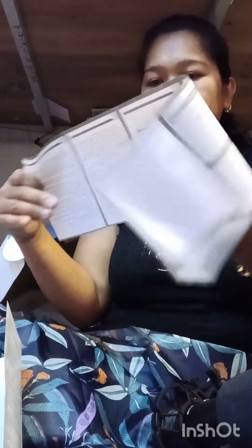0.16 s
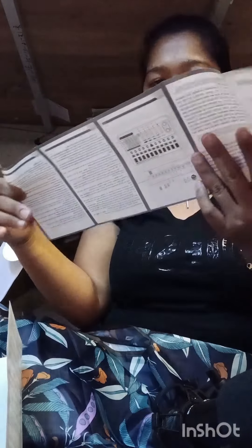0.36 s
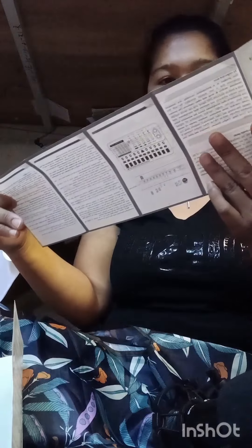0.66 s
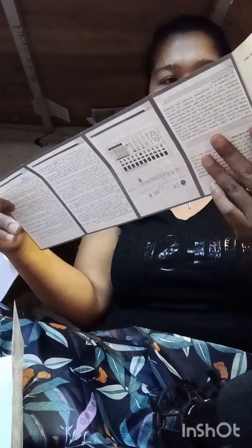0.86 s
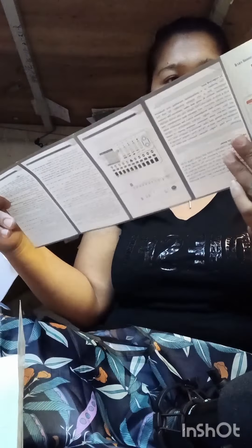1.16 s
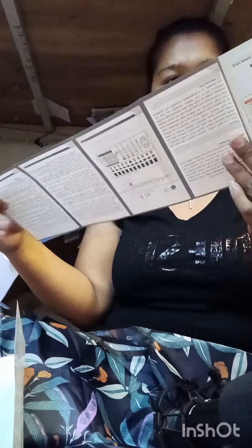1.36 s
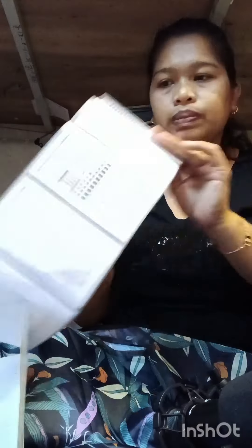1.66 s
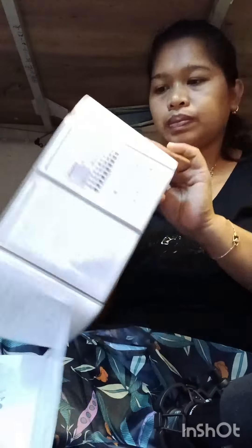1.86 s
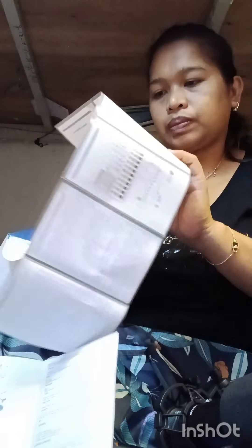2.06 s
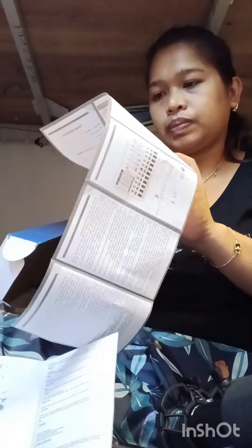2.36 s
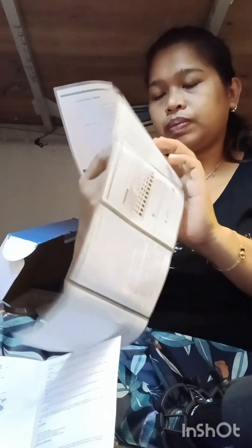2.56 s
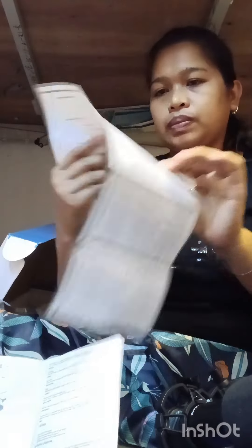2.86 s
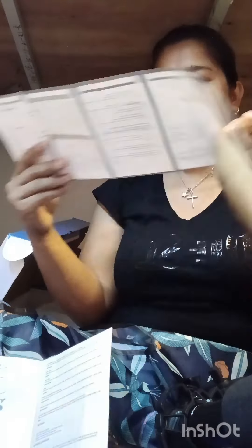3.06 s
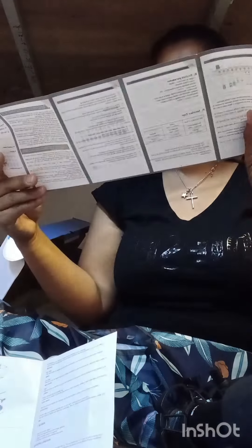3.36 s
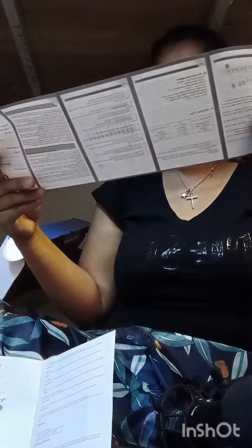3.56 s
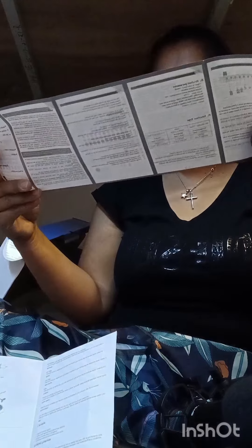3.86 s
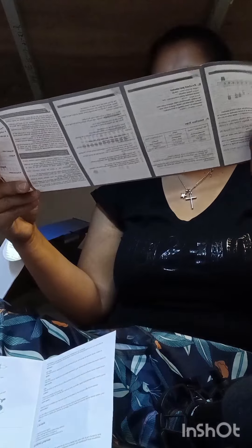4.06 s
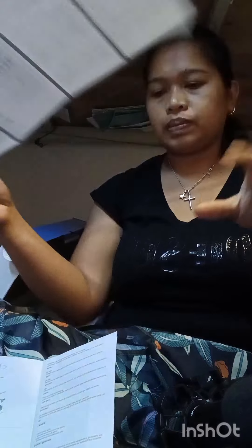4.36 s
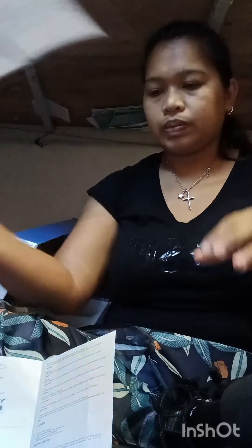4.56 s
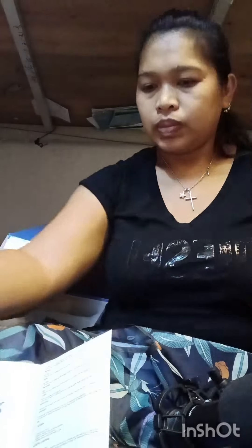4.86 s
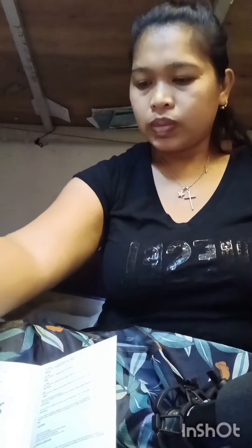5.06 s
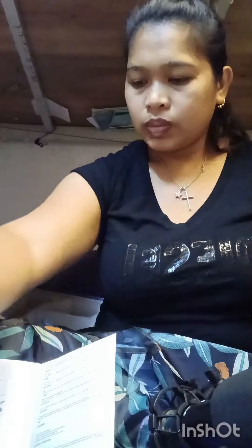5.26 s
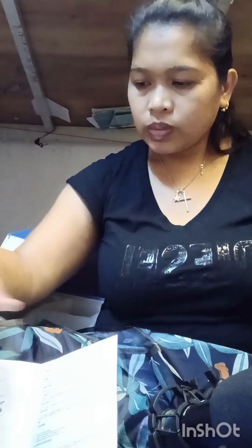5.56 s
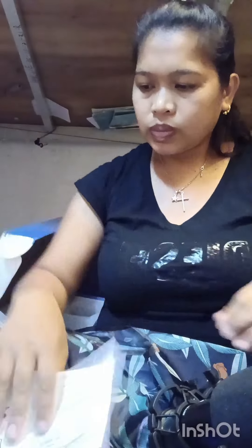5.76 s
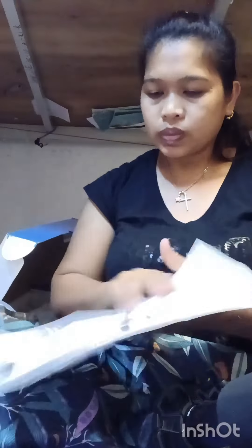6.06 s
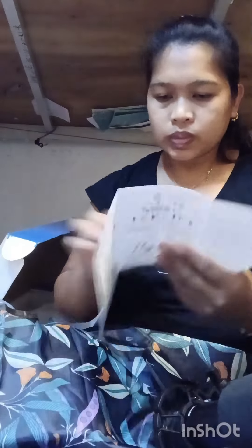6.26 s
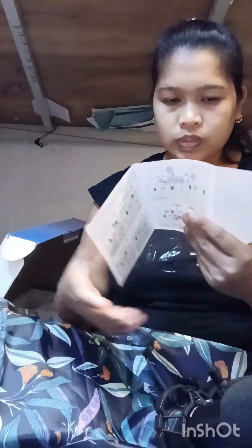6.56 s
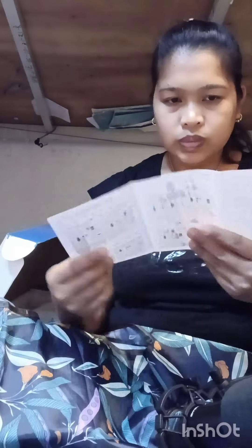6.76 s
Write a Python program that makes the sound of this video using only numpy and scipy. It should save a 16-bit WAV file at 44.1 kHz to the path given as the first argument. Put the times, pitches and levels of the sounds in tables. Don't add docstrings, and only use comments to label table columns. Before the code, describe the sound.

A quiet small room with low, slightly wavering fan hum and soft hiss, heard by a close phone. At 0 to 0.1 s fingers faintly scuff paper with a tiny low flap, then near stillness until light rubbing around 0.9 to 1.05 s. Small dry crackles at 1.3 to 1.8 s open the folded sheet, strongest near 1.6 with soft flaps. A short rustle and thump come at 2.4. At 2.73 to 2.78 two hard bright snaps turn it over, followed by airy sliding with a hollow, shifting colour until 3.2, and a small tick at 3.4. It is almost still until about 4.9, when the sheet is laid down with knocky creases and drags on the table to 5.3. From 5.5 rustles build; a thump and snaps at 5.78 lead to the loudest crackling burst at 5.95 to 6.12. One faint pop at 6.62, then room tone.

```python
import sys
import numpy as np
from scipy import signal
from scipy.fft import rfft, irfft
from scipy.io import wavfile
from scipy.ndimage import uniform_filter1d, map_coordinates

SR = 44100
rng = np.random.default_rng(int(sys.argv[2]) if len(sys.argv) > 2 else 0)


def gain_from_decibels(decibels):
    exponent = np.asarray(decibels, float) / 20
    return 10 ** exponent


def file_out(sig):
    cols = np.atleast_2d(sig).T
    lim = np.clip(cols, -1, 1)
    pcm = np.round(lim * 32767).astype(np.int16)
    wavfile.write(sys.argv[1], SR, pcm)


N = 305171
PORT_LAG_S = 0.00018

# (f/Hz, level/dB per Hz)
PAPER_LEFT = [(150, -84.5), (330, -72.5), (480, -76), (600, -75.5), (780, -66.5), (1400, -61),
              (2200, -51.5), (3500, -62.5), (4600, -80), (5600, -102), (7300, -79), (9000, -99),
              (12000, -100), (15200, -101)]
PAPER_RIGHT = [(150, -90.5), (350, -75), (650, -92), (1200, -71.5), (2200, -65), (4000, -72.5),
               (6500, -76.5), (8500, -84.5), (9300, -87.5), (11000, -73.5), (12500, -91), (13700, -91),
               (15200, -80.5)]


def paper():
    fibres = crackle(rate=2800, spread_db=1.0, smear_s=0.0019,
                     noise=patchy(depth_db=2.0, hold_s=0.04, step_oct=0.111))
    rubbing = crackle(rate=3500, spread_db=2.8, smear_s=0.0018,
                      noise=patchy(depth_db=5.2, hold_s=0.05, step_oct=0.06))
    snapping = rng.choice([-1.0, 1.0], (2, N))
    rubbing = mirrored(rubbing, snapping[:, ::-1])
    sliding, pan_db = rustle()
    clicks, tails, rings = creases(fibres)

    hz = np.fft.rfftfreq(2048, 1 / SR)
    ports = gain_from_decibels(np.array([on_log(PAPER_LEFT, hz), on_log(PAPER_RIGHT, hz)]))
    above_flex, above_body = [1 / (1 + (edge / (hz + 1)) ** 6) for edge in (900, 4000)]
    bands = 1 - above_flex, above_flex - above_body, above_body
    no_rumble = 1 + (180 / (hz + 1)) ** 4

    out = rings * gain_from_decibels(np.array([[3.0], [-3.5]]))
    for band, alike, slide, click, tail in zip(bands, (0.8, 0.45, 0.3), sliding, clicks, tails):
        colour = ports * np.sqrt(band / no_rumble + 1e-8)
        colour /= np.sqrt(np.mean(colour ** 2) / 2)
        push = slide * rubbing + gain_from_decibels(4.0) * click * snapping + tail * fibres
        push[0] = alike * push[1] + np.sqrt(1 - alike ** 2) * push[0]
        for port in range(2):
            out[port] += signal.fftconvolve(push[port], causal(20 * np.log10(colour[port])))[:N]

    turn_db = 1.22 * (pan_db - 8.5)
    left = delay(out[0], PORT_LAG_S) * gain_from_decibels(turn_db / 2)
    right = out[1] * gain_from_decibels(-turn_db / 2)
    return np.array([left, right]) + scuffs(mirrored(fibres, snapping[::-1])) + pops()


# (t/s, peak level/dB, panel ring f/Hz, crisp level/dB re peak, crackle tail level/dB re peak)
CREASES = [(0.902, -53, 1460, -15, 0), (1.002, -51.5, 980, -6, -7), (1.316, -42.5, 1600, -17.5, -4),
           (1.487, -39.5, 3370, -18.5, -1), (1.53, -40.5, 1780, -35, -1), (1.575, -44, 804, -24, 7),
           (1.595, -31.5, 815, -33, -27), (1.595, -32, 2720, -27, -12),
           (1.621, -34, 2170, -19, -0.5), (1.781, -42, 1610, -25, -14), (2.38, -53, 3300, -1, 3),
           (2.394, -42.5, 1820, -35, 2.5), (2.459, -55, 1160, -11.5, 2),
           (2.654, -37, 1800, -17.5, -5.5), (2.682, -40, 1850, -15.5, -3.5),
           (2.725, -18, 1620, -10, -5.5), (2.733, -26, 1290, -8.5, -6),
           (2.7746, -18.5, 2110, -26, -7.5), (2.849, -58, 1900, 1, -3),
           (2.998, -38.5, 1850, -33, 0), (3.057, -37, 2050, -29, -4), (3.375, -44.5, 1820, -28, 2),
           (4.594, -54, 2400, -20, 6), (4.922, -31, 1480, -27, -2), (4.944, -26, 810, -35, -11),
                    (4.9543, -21, 810, -27, -7), (5.235, -33, 1990, -23, -8.5), (5.523, -55, 915, -14, -15),
                    (5.57, -42.5, 1790, -15, 0.5), (5.747, -32.5, 1500, -20, -2),
                    (5.766, -24, 1800, -44, -10.5), (5.783, -22, 2100, -31, -16),
                    (5.917, -56, 2580, -16, -17), (5.955, -36.5, 1220, -3.5, -23),
                    (5.965, -23, 2370, -5.5, -2.5), (5.981, -24, 2940, -16, -9),
                    (6.018, -29.5, 2620, -12.5, 1), (6.047, -31.5, 2490, -8.5, -6),
                    (6.081, -24, 2730, -30, -19), (6.088, -11.5, 2520, -21, -15),
                    (6.097, -33, 2210, -7, -28), (6.623, -40, 1110, -32, -16)]


def creases(fibres):
    clicks, tails, rings = np.zeros((3, N)), np.zeros((3, N)), np.zeros((2, N))
    t = np.arange(int(0.15 * SR)) / SR
    reach_s, thud_db, body_db, ring_s = 0.001, -20.5, -10.5, 0.002
    for s, db, hz, crisp_db, tail_db in CREASES:
        start = int((s + reach_s) * SR)
        at = slice(start, start + len(t))
        bands = gain_from_decibels(db + np.array([[thud_db], [body_db], [crisp_db + 1.0]]))
        clicks[:, at] += bands * np.exp(-t / 0.0012)
        gate = 1 / (1 + (t / 0.029) ** 6)
        tail = np.minimum(t / 0.0021, 1) * gain_from_decibels(tail_db - 60 * t / 0.12) * gate
        tails[:, at] += bands * tail
        struck = np.sin(2 * np.pi * hz * t) * np.exp(-t / ring_s) * np.minimum(t / 0.00028, 1)
        shaken = resonance(resonance(tail * fibres[:, at], hz, hz / 4), hz, hz / 4.1)
        rings[:, at] += gain_from_decibels(db - 3.0) * struck + gain_from_decibels(db - 1.5) * shaken
    return clicks, tails, rings


# (t/s, peak level/dB,
# f/Hz, ring/ms, left minus right level/dB)
POPS = [(1.315, -44, 1600, 3.3, 6), (1.531, -45, 980, 4, 12), (1.574, -46, 3780, 2, -2),
        (1.595, -30.5, 2700, 2.3, 3), (1.598, -37.5, 4370, 1.7, -9), (1.605, -39, 3630, 2.3, 0),
        (1.624, -38, 2060, 2.7, 10), (1.781, -49, 1600, 2.5, 7), (2.682, -45, 1900, 1.6, 7),
        (2.7247, -19.5, 2930, 1.2, -3), (2.7335, -25, 10400, 1, -14), (2.7758, -14, 2110, 1.5, 9),
        (2.778, -26.5, 7400, 1, -9), (3.001, -37.5, 1890, 5.4, 18), (3.035, -46, 4960, 3.3, -7),
        (3.06, -43, 1940, 2.6, 17), (3.376, -46, 1900, 1.8, 7), (4.925, -42, 3640, 3, 3),
        (4.946, -35, 4340, 2.2, 3), (4.957, -34, 4070, 2, 10), (4.957, -34, 1580, 2.5, 5),
        (5.181, -47, 4860, 4.3, 3), (5.2358, -23, 2250, 0.52, 5), (5.522, -40, 1040, 2.4, 8),
        (5.765, -26.5, 2200, 1.5, 10), (5.766, -43, 4320, 1.5, 0), (5.782, -31.5, 2850, 2.2, 12),
        (5.967, -20, 2280, 2, -5), (5.968, -24, 6800, 1, -12), (5.981, -29, 1870, 1.8, -2),
        (6.082, -27, 2450, 1, 5), (6.09, -29.5, 5400, 1.2, -19), (6.089, -34, 7500, 1, -17),
        (6.089, -27, 1150, 1.6, 5), (6.098, -33, 5050, 2, -10), (6.098, -34, 2080, 1.5, 5),
        (6.099, -28.5, 880, 1.9, 11), (6.623, -47, 1080, 2.7, 5),
        (1.3155, -50, 1000, 3.4, 11), (1.487, -47, 3500, 3, 0), (1.53, -50, 1900, 4, 6),
              (1.5955, -35, 810, 3, 4), (1.5955, -46, 6300, 1.7, -10), (2.381, -52, 3300, 2, 0),
              (2.381, -50, 5260, 1.5, -8), (2.397, -49, 2100, 3, 5), (2.654, -48, 1790, 1.8, 6),
              (2.7257, -26, 890, 2.1, 5), (2.789, -35, 2090, 3, 5), (3.045, -36, 2650, 3.5, 8),
              (3.376, -51.5, 1220, 3, 8), (4.9455, -32, 2000, 1.5, 6), (4.947, -28, 910, 2.9, 8),
              (5.066, -39, 1337, 8, 3), (5.749, -33, 1550, 2, 5), (5.754, -36, 870, 2.5, 4),
              (5.916, -42, 1910, 3, 5), (5.957, -42, 4300, 2, -5), (5.972, -30.5, 560, 6.9, 9),
              (5.974, -29, 2600, 1.5, -2), (5.9803, -24, 2500, 1.8, 0), (5.9815, -24, 3500, 1.4, -3),
              (5.999, -37, 1800, 2, 0), (6.106, -38, 495, 5, 5), (6.119, -37.5, 536, 5.4, 5),
              (6.623, -50, 2300, 1.5, 3)]


def pops():
    out = np.zeros((2, N))
    ms = 1000 * np.arange(int(0.04 * SR)) / SR
    for s, db, hz, ring_ms, pan_db in POPS:
        ring = np.sin(2 * np.pi * hz * ms / 1000) * np.exp(-ms / ring_ms) * np.minimum(ms / 0.4, 1)
        start = int(s * SR)
        out[:, start:start + len(ms)] += ring * gain_from_decibels(db - 2.5 + np.array([[pan_db], [-pan_db]]) / 2)
    return out


# (peak t/s, rise/ms per 20 dB, fall/ms per 20 dB,
# peak level/dB, hiss level/dB re peak)
SLIDES = [(.044, 148, 73, -59.5, -2), (.922, 42, 94, -64.5, 2.5), (1.04, 68, 59, -59.5, -2.5),
          (1.317, 2, 24, -66.5, -9), (1.486, 11, 55, -63, -4), (1.599, 43, 42, -45.5, -6.5),
          (2.394, 75, 46, -56, -1), (2.478, 50, 16, -66.5, 2.5), (2.727, 3.5, 69, -33, -7),
          (2.776, 5, 43, -39.5, -9), (2.866, 64, 63, -51.5, 2.5), (3.02, 195, 170, -64, 12.5),
          (3.045, 74, 41, -45, -2), (3.379, 25, 84, -58, -5), (3.5, 126, 55, -72, 3),
          (4.06, 50, 60, -73, 9.5),
          (4.949, 14, 27, -38.5, -24), (5.039, 55, 24, -52.5, 0.5), (5.069, 14, 24, -46.5, -32),
                   (5.176, 58, 56, -60, -7), (5.24, 17, 55, -59, -14), (5.58, 23, 26, -60, -6),
                   (5.68, 42, 50, -52, -11), (5.749, 23, 29, -44, -9), (5.79, 16, 45, -44, -4.5),
                   (5.919, 6, 34, -46, -11), (5.97, 17, 60, -27, -11), (6.03, 61, 53, -49, 4),
                   (6.092, 14, 44, -47.5, -0.5), (6.625, 30, 12, -56, -22)]
# (peak t/s, rise/ms per 20 dB, fall/ms per 20 dB, peak level/dB)
FLEXES = [(.092, 80, 30, -71), (1.04, 62, 50, -64.5), (1.34, 42, 19, -63), (1.6, 51, 63, -48.5),
          (2.401, 14, 44, -51.5), (2.73, 4, 80, -58), (2.768, 27, 53, -43.5), (2.868, 27, 42, -63),
          (3.056, 20, 28, -48), (3.378, 14, 88, -61), (4.02, 8, 70, -66), (4.95, 34, 58, -43.5),
          (5.071, 22, 26, -45.5), (5.176, 35, 32, -60), (5.28, 52, 42, -69), (5.525, 4, 37, -54),
          (5.685, 65, 47, -49), (5.742, 10, 26, -42.5), (5.787, 34, 26, -37), (5.957, 8.5, 83, -39.5),
          (6.0, 48, 45, -42), (6.093, 10, 47, -50), (6.626, 43, 19, -53)]
# (t/s, left minus right level/dB)
SIDE_DB = [(0, 6), (.95, 8.5), (1.5, 4), (1.66, 8), (2.4, 6), (2.74, 7.5), (2.81, 1.5), (3.04, 4),
           (3.4, 3.5), (4.059, 5), (4.95, 10.5), (5.07, 3), (5.24, 11), (5.6, 7), (5.69, -3), (5.76, 4.5),
           (5.96, -0.5), (6.09, 8.5)]


def rustle():
    gains = np.zeros((3, N))
    for row in FLEXES:
        swell, at = stroke(*row)
        gains[0, at] += swell
    for *row, hiss_db in SLIDES:
        swell, at = stroke(*row)
        gains[1:, at] += swell * gain_from_decibels(np.array([[0], [hiss_db]]))
    return gains, np.interp(np.arange(N) / SR, *np.transpose(SIDE_DB))


def stroke(s, rise_ms, fall_ms, db):
    ms = 1000 * (np.arange(N) / SR - s)
    at = (ms > -2 * rise_ms) & (ms < 2 * fall_ms)
    away = np.maximum(-ms[at] / rise_ms, ms[at] / fall_ms)
    return gain_from_decibels(db - 20 * away ** 1.6), at


# (middle t/s, rms level/dB, centre f/Hz, width/oct, length/s)
SCUFFS = [(0.048, -60, 11000, 0.074, 0.027), (0.053, -57, 1830, 0.51, 0.028),
          (0.927, -68.5, 4760, 0.15, 0.055), (0.934, -62.5, 11250, 0.076, 0.044),
          (0.96, -65, 1570, 0.31, 0.4), (1.042, -74, 4470, 0.38, 0.054), (1.492, -59, 3435, 0.08, 0.019),
          (1.535, -54.5, 3280, 0.058, 0.019), (1.55, -58, 1820, 0.12, 0.054), (1.58, -56, 790, .2, 0.022),
          (1.599, -48, 794, 0.19, .015), (1.624, -46, 3320, 0.84, 0.024), (1.629, -48.5, 790, 0.086, 0.02),
          (2.742, -34.5, 890, 0.52, 0.016), (2.738, -41, 10800, 0.5, 0.021),
          (2.791, -34, 2040, 0.67, 0.014), (2.862, -52, 1890, 0.21, 0.055), (2.94, -54.5, 6000, .5, .1),
          (2.955, -50, 11100, 0.15, 0.17), (3.043, -49, 2900, 0.81, 0.039), (3.122, -56, 3300, 0.13, 0.043),
          (3.133, -63.5, 5850, 0.08, 0.11), (3.13, -62, 4870, 0.11, 0.098), (3.11, -61.5, 7000, .08, 0.084),
          (3.04, -52, 7000, .1, .03), (5.53, -50, 913, 0.23, 0.02), (5.57, -69, 4200, 0.7, 0.021),
          (5.577, -49.5, 950, 0.3, 0.024), (5.662, -57.5, 800, 1, 0.04), (5.684, -62, 10900, 0.29, 0.016),
          (5.693, -67, 5185, 0.49, 0.041), (5.814, -66, 7000, 0.94, 0.1), (5.978, -34.5, 1150, .4, 0.013),
          (5.984, -38, 2970, 0.26, 0.014), (5.985, -37.5, 1540, 0.3, 0.042),
          (6.055, -48, 2500, 0.39, 0.044), (6.093, -42, 840, 0.36, 0.016),
          (6.122, -47.5, 2700, 0.94, 0.021)]
# (middle t/s, rms level/dB, centre f/Hz, width/oct, length/s)
DRAGS = [(4.93, -43, 3700, 0.17, 0.013), (4.935, -61.5, 9500, 0.28, 0.028), (4.944, -31, 860, 0.48, 0.011),
         (4.95, -50, 3900, 0.12, 0.027), (4.956, -32, 1300, 0.81, 0.0098), (4.984, -46.5, 780, 0.3, 0.048),
         (5.024, -50, 910, 0.4, 0.028), (5.032, -43.5, 8500, 0.34, 0.012), (5.074, -44, 1330, 0.12, 0.021),
         (5.155, -57.5, 2100, 0.98, 0.018), (5.186, -62, 9000, 0.45, 0.015), (5.185, -56, 4950, .1, 0.015),
         (4.8, -66, 5100, 0.07, 0.044), (5.052, -62, 3900, .12, .03), (5.05, -65, 6000, .1, .025),
         (5.2, -61, 1260, 0.16, .04), (5.275, -62, 3750, .15, 0.036), (5.253, -53, 2250, 0.45, 0.014),
         (5.266, -57.5, 2100, 1, 0.04), (5.9, -64, 9900, 0.27, 0.025)]
# (f/Hz, left minus right level/dB)
PORT_TILT = [(1000, 7.5), (2200, 3), (4600, -15), (11000, -15.5)]


def scuffs(rubbing):
    out = np.zeros((2, N))
    rows = [(*row, on_log(PORT_TILT, row[2])) for row in SCUFFS]
    rows += [(*row, 1.5) for row in DRAGS]
    for s, db, hz, octaves, length, pan_db in rows:
        at = slice(max(int((s - 0.08) * SR), 0), int((s + 0.19) * SR))
        t = np.arange(at.start, at.stop) / SR - s
        swell = np.exp(-(2 * t / length) ** 2)
        band = resonance(resonance(rubbing[:, at], hz, hz * octaves), hz, hz * octaves)
        gain = gain_from_decibels(db - 1.0 + np.array([[pan_db], [-pan_db]]) / 2)
        out[:, at] += swell * band / band.std() * gain
    return out


def crackle(rate, spread_db, smear_s, noise):
    sparks = (rng.random(N) < rate / SR) * gain_from_decibels(spread_db * rng.exponential(size=N))
    glow = signal.lfilter([1], [1, -np.exp(-1 / (smear_s * SR))], sparks) + 1e-9
    return glow * noise / np.sqrt(np.mean(glow ** 2))


def patchy(depth_db, hold_s, step_oct):
    hz, t, z = signal.stft(rng.standard_normal((2, N)), SR, nperseg=512)
    field = rng.standard_normal((80, 600))
    mode, moment = np.meshgrid(np.log2(1 + hz / 2500) / step_oct, t / hold_s, indexing="ij")
    where = mode + 8 + 2.5 * np.sin(t * 9), moment
    modes_db = depth_db * map_coordinates(field, where, order=1)
    noise = signal.istft(z * gain_from_decibels(modes_db), SR, nperseg=512)[1][:, :N]
    return noise / np.sqrt(np.mean(noise ** 2))


# (t/s, extra path/ms, echo share 0-1)
MIRROR = [
    (2.8, .98, 0),
    (2.86, .93, .38),
    (2.93, .87, .35),
    (3.0, .845, .3),
    (3.06, .86, .38),
    (3.12, .85, .52),
    (3.2, .855, .55),
    (3.3, .855, 0),
]


def mirrored(x, even):
    s, path_ms, share = np.transpose(MIRROR)
    n = np.arange(N)
    late = np.interp(n / SR, s, path_ms) * SR / 1000
    share = np.interp(n / SR, s, share)
    mix = 0.55 * share / share.max()
    x = np.sqrt(1 - mix) * x + np.sqrt(mix) * even
    out = x.copy()
    for k in (1, 2):
        out += share ** k * np.array([map_coordinates(c, [n - k * late]) for c in x])
    return out / np.sqrt(1 + share ** 2 + share ** 4)


# (t/s, peak level/dB, f/Hz, t60/s)
BUMPS = [(0.072, -40.5, 81.5, 0.078), (1.576, -39, 454, 0.1), (1.594, -36, 443, 0.054),
         (1.61, -34.5, 318, 0.078), (1.637, -48, 390, 0.11), (2.429, -35.5, 251, 0.038),
         (2.726, -40, 415, 0.06), (4.943, -31, 485, 0.1), (5.162, -41.5, 116, 0.084),
         (5.66, -49, 383, 0.06), (5.701, -45.5, 337, 0.11), (5.782, -13.5, 330, 0.016),
         (5.77, -45, 201, .1), (5.954, -29.5, 325, 0.056), (5.963, -23.5, 498, 0.06),
         (6.098, -32, 473.5, 0.073), (6.113, -43, 564, 0.056)]


def bumps():
    out = np.zeros(N)
    t = np.arange(int(0.2 * SR)) / SR
    for s, db, hz, t60 in BUMPS:
        fade = gain_from_decibels(db - 60 * t / max(t60, 0.02))
        flap = np.sin(2 * np.pi * hz * t) * fade * np.minimum(t / 0.011, 1)
        out[int(s * SR):int(s * SR) + len(t)] += flap
    return out


def walls(x):
    t = np.arange(int(0.25 * SR)) / SR
    tails = rng.standard_normal((2, len(t))) * gain_from_decibels(-60 * t / 0.11) * (t > 0.004)
    tails = signal.lfilter([0.5], [1, -0.5], tails)
    return gain_from_decibels(-35.0) * np.array([signal.fftconvolve(c, h)[:N] for c, h in zip(x, tails)])


# (f/Hz, level/dB per Hz)
ROOM_LEFT = [(30, -118), (60, -90), (110, -84.5), (165, -92.5), (330, -91.5), (600, -94.5), (1100, -100),
             (2100, -93), (3800, -106.3), (5600, -112.6), (7000, -110.3), (9000, -121.6), (13500, -131),
             (15200, -123.8)]
ROOM_RIGHT = [(30, -104), (60, -91.5), (110, -84), (165, -93.5), (330, -92.5), (600, -101.7),
              (1100, -100.5), (2100, -99.2), (4500, -107.6), (8200, -119.0), (11000, -106.0), (12500, -115),
              (13700, -119), (15200, -112.7)]
# (f/Hz, shared part 0-1)
ALIKE = [(60, 0.99), (300, 1), (700, 0.12), (1500, 0.57), (3000, 0.14), (6000, 0.3)]
# (f/Hz, width/Hz, rms level/dB)
FAN = [(115.9, 7.9, -71), (194.6, 14, -74.5), (349.8, 14.3, -71.5), (459.2, 10.6, -79)]
# (t/s, level/dB)
GATE = [
    (0, 4),
    (.8, 1),
    (1.799, 3),
    (2.6, -0.5),
    (3.2, 1),
    (4.4, 1),
    (5.4, 2),
    (6.92, 2),
]


def room():
    hz = np.fft.rfftfreq(N, 1 / SR)
    shared, own = rfft(rng.standard_normal((2, N)))
    alike = np.clip(on_log(ALIKE, hz), 0, 1)
    lag = np.exp(-2j * np.pi * hz * PORT_LAG_S)
    left = (alike * shared * lag + np.sqrt(1 - alike ** 2) * own) * gain_from_decibels(on_log(ROOM_LEFT, hz))
    right = shared * gain_from_decibels(on_log(ROOM_RIGHT, hz))
    tone = irfft(np.sqrt(SR / 2) * np.array([left, right]), N)

    hum = np.zeros(N)
    for f, width_hz, db in FAN:
        level = gain_from_decibels(db) * np.sqrt(SR / np.pi / width_hz)
        hum += level * resonance(rng.standard_normal(N), f, width_hz)

    hiss = signal.sosfilt(signal.butter(2, 4000, "high", fs=SR, output="sos"), tone)
    gate_db = np.interp(np.arange(N) / SR, *np.transpose(GATE))
    gated = (tone - hiss) * gain_from_decibels(0.14 * gate_db) + hiss * gain_from_decibels(gate_db)
    return gated * gain_from_decibels(0.5 * walk(3) + 0.5 * walk(12)) + hum


def walk(rate):
    k = int(SR / rate)
    return 0.36 * uniform_filter1d(np.repeat(rng.standard_normal(N // k + 1), k), k)[:N]


def on_log(table, hz):
    f, v = np.transpose(table)
    return np.interp(np.log(hz + 1), np.log(f), v)


def causal(db):
    cep = irfft(db * np.log(10) / 20)
    half = len(cep) // 2
    cep[1:half] *= 2
    cep[half + 1:] = 0
    return irfft(np.exp(rfft(cep)))[:half]


def delay(x, s):
    return irfft(rfft(x) * np.exp(-2j * np.pi * np.fft.rfftfreq(len(x), 1 / SR) * s), len(x))


def resonance(x, hz, width_hz):
    return signal.lfilter(*signal.iirpeak(hz, hz / width_hz, fs=SR), x)


def scene():
    sheet = paper()
    return sheet + walls(sheet) + bumps() + room()


def top_cut(x):
    return signal.sosfilt(signal.butter(12, 16780, fs=SR, output="sos"), x)


def record(dry):
    mix = signal.sosfilt(signal.ellip(10, 0.3, 60, 15600, fs=SR, output="sos"), dry)
    return top_cut(mix)


dry = scene()
out = record(dry)
file_out(out)
```